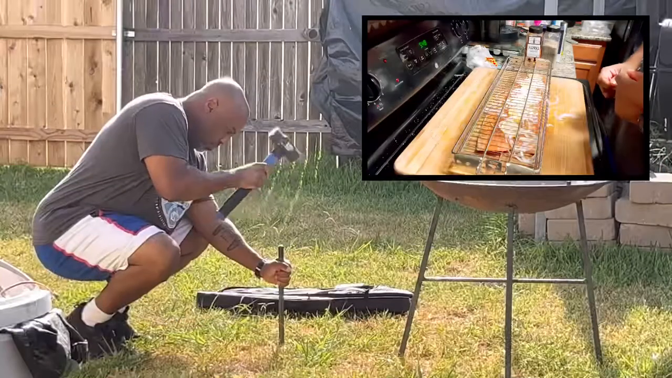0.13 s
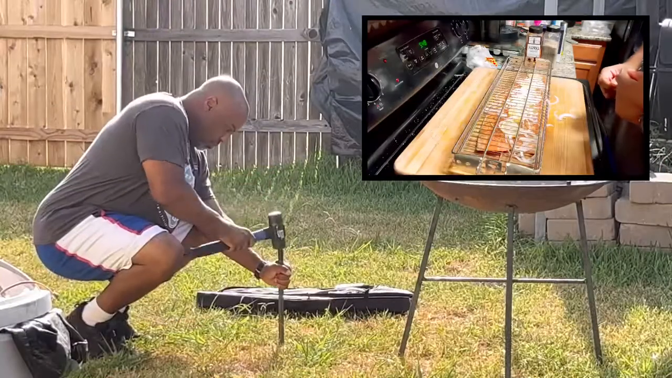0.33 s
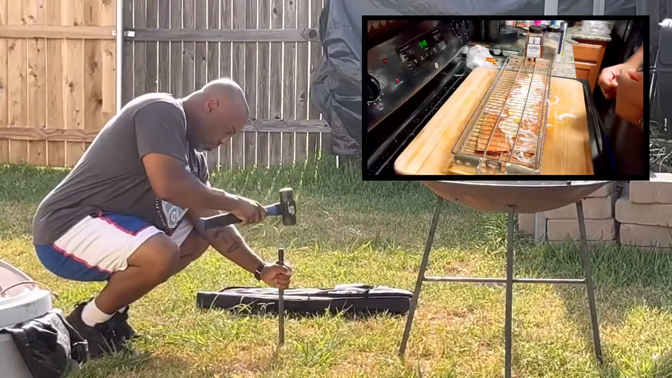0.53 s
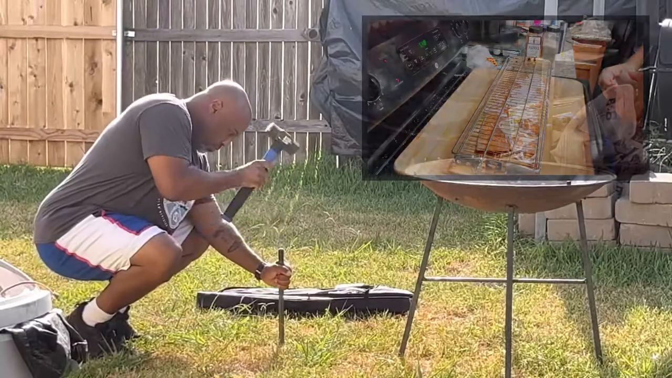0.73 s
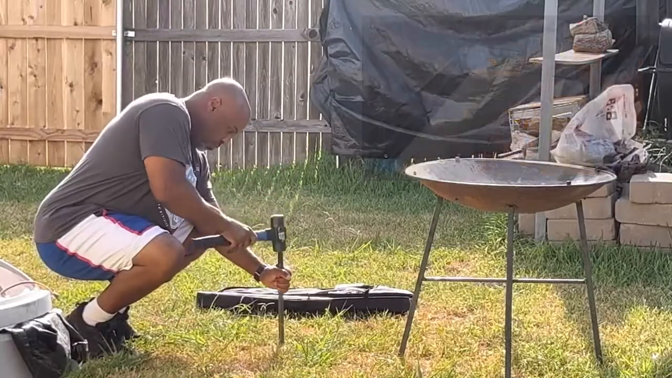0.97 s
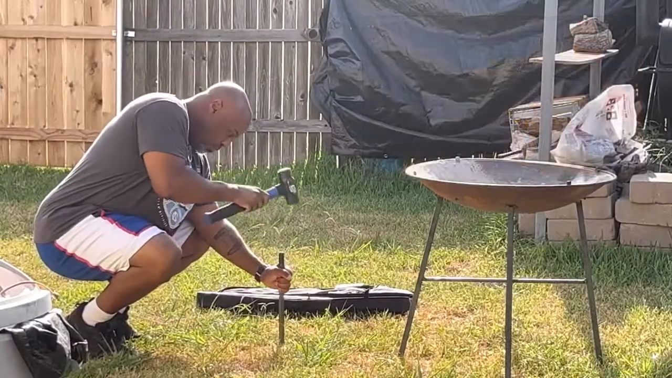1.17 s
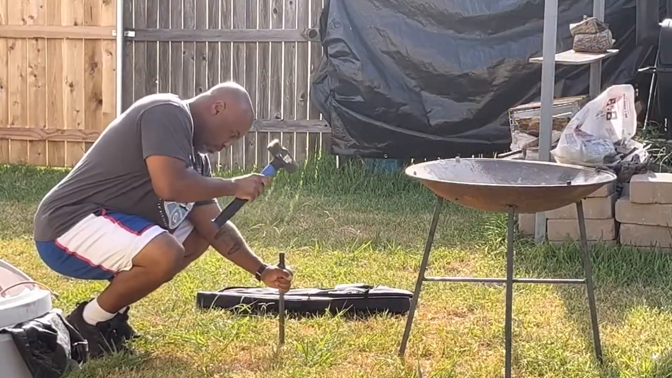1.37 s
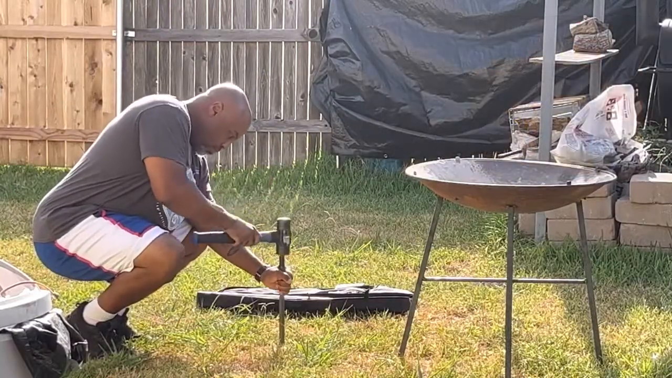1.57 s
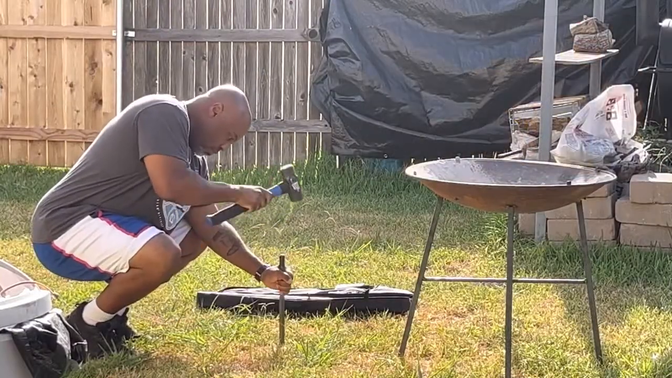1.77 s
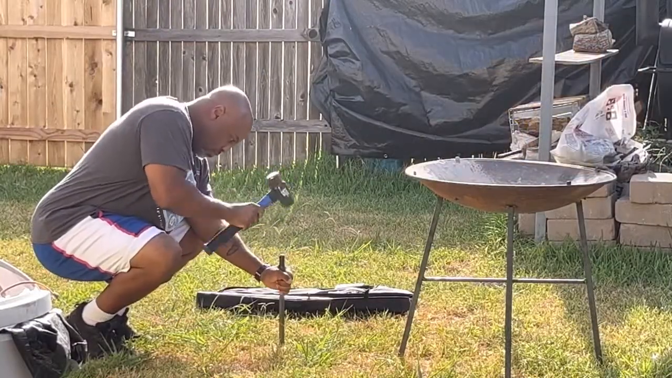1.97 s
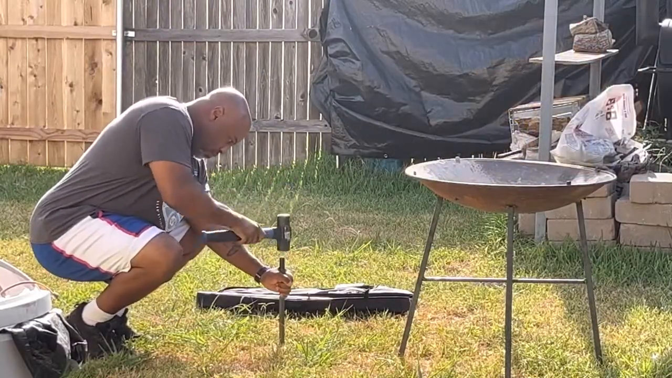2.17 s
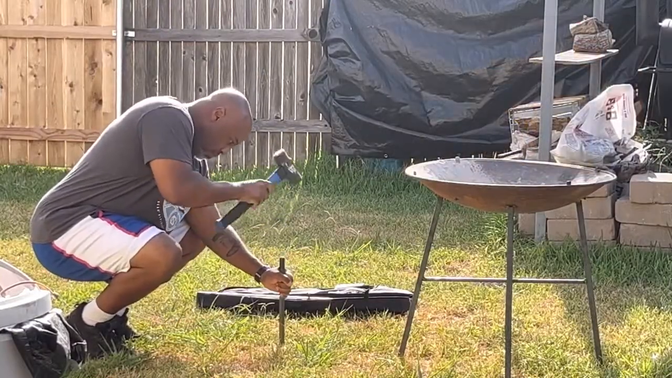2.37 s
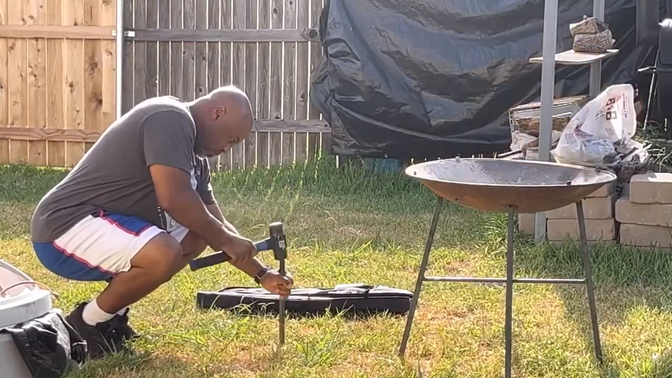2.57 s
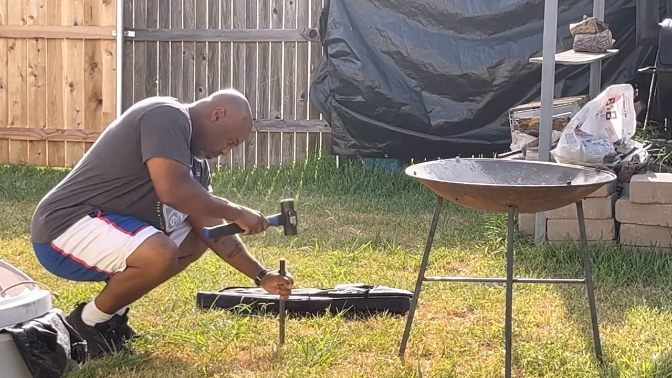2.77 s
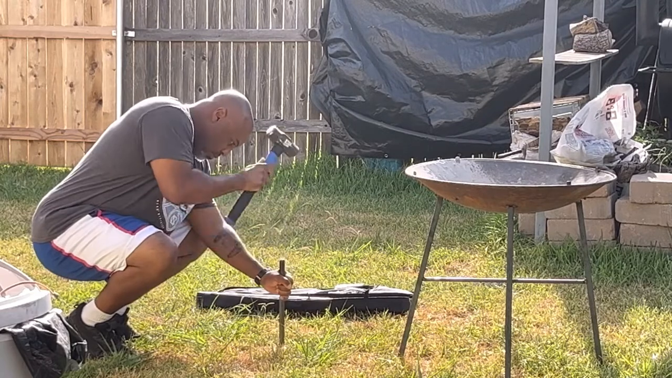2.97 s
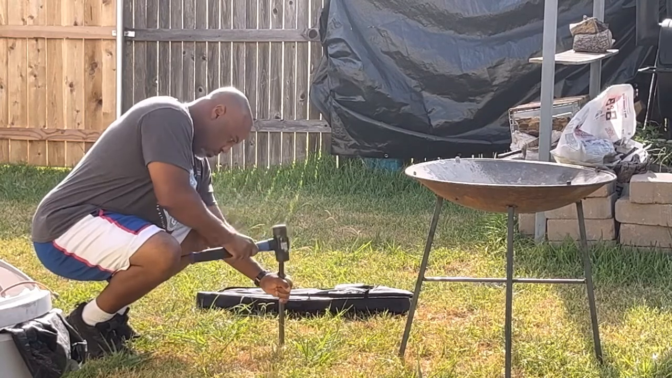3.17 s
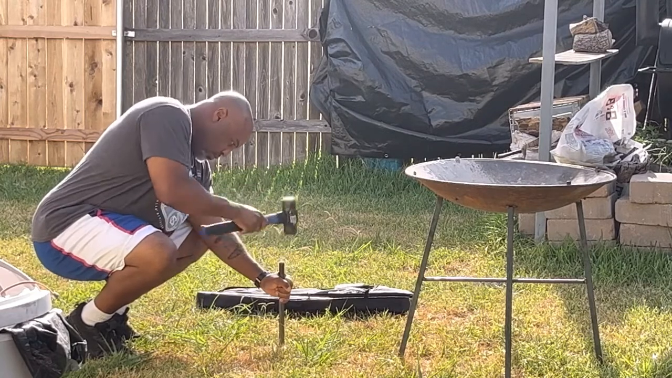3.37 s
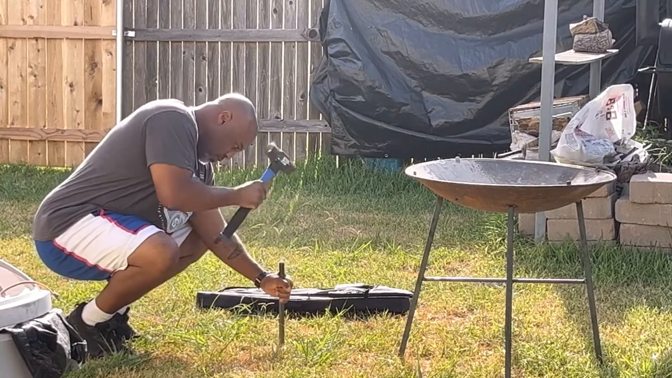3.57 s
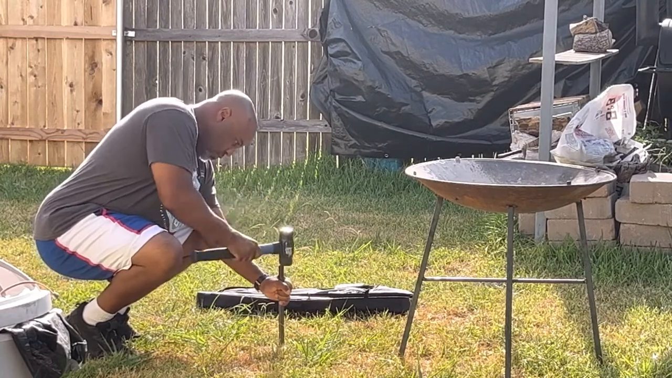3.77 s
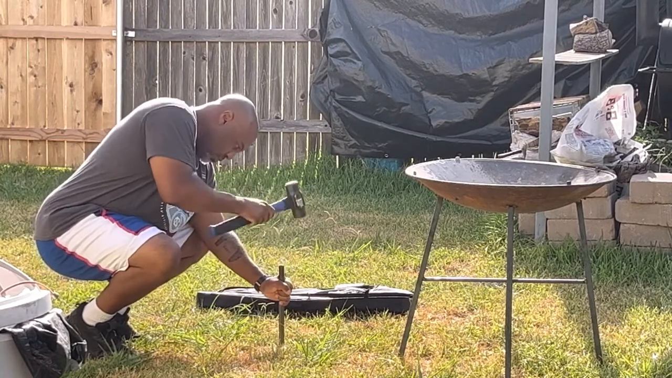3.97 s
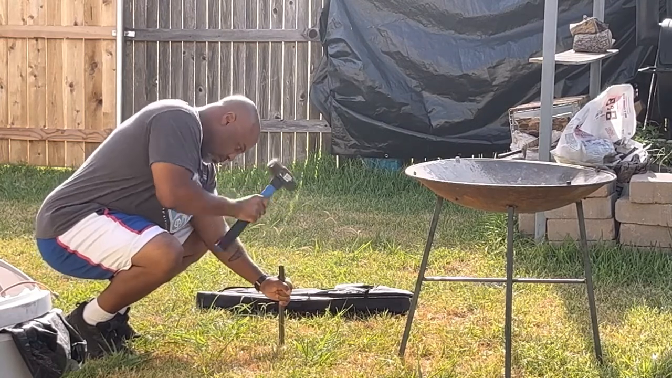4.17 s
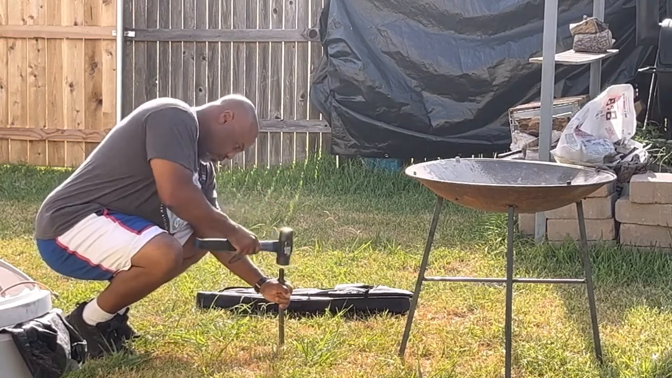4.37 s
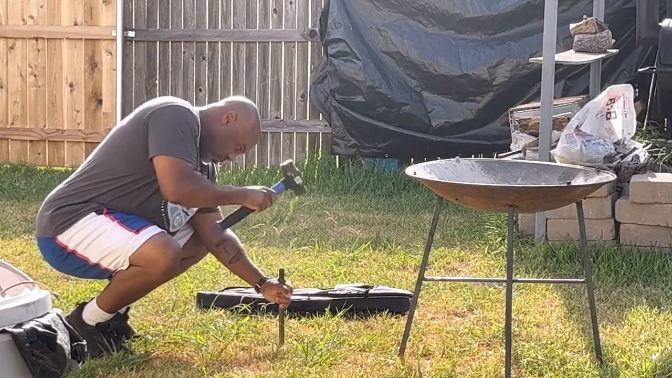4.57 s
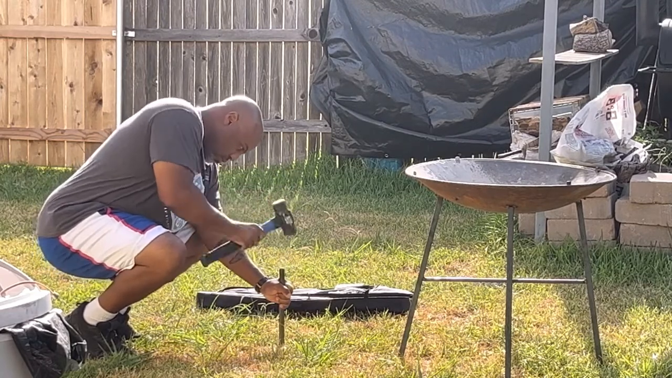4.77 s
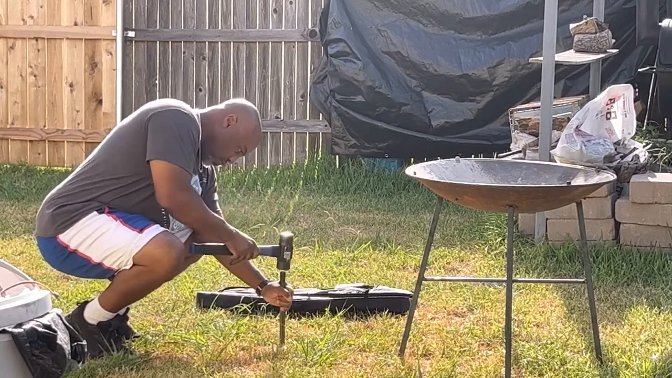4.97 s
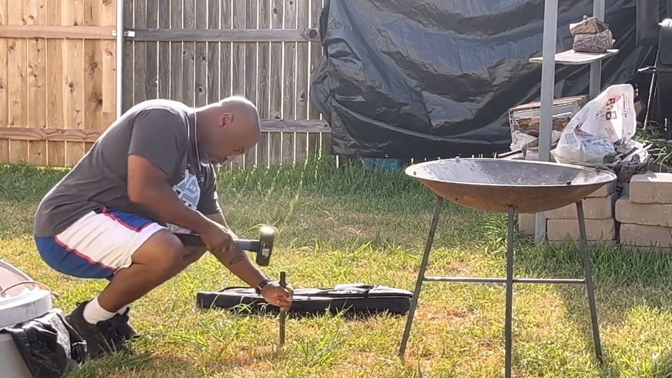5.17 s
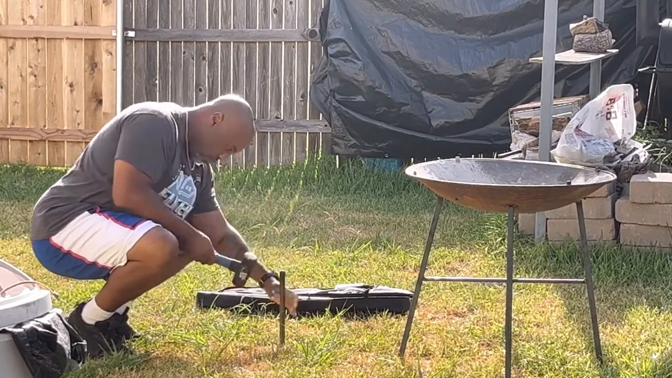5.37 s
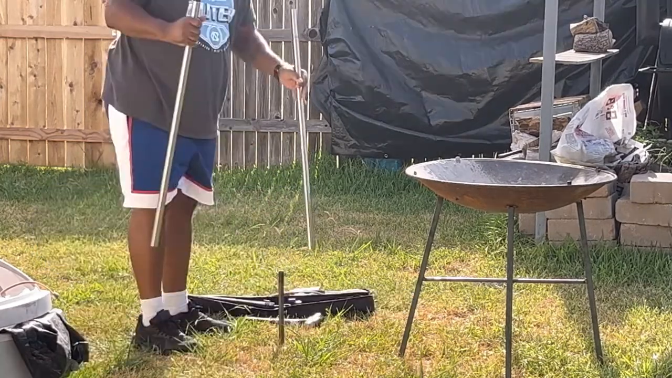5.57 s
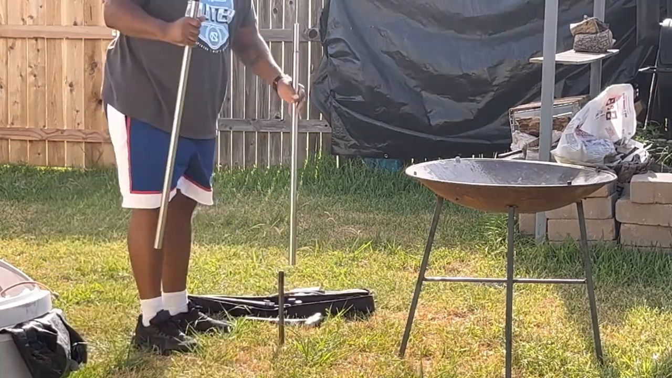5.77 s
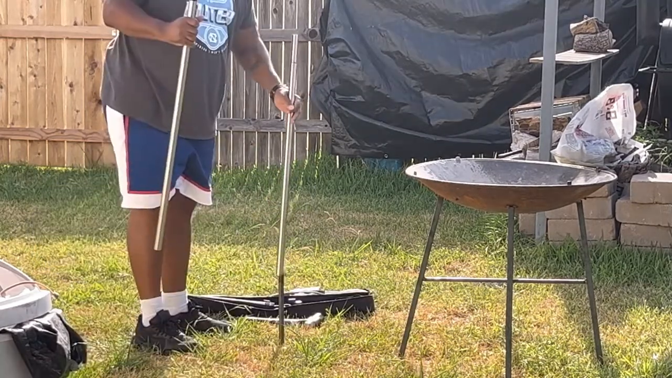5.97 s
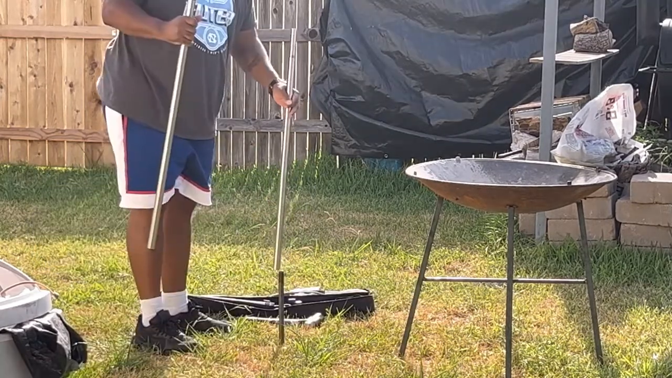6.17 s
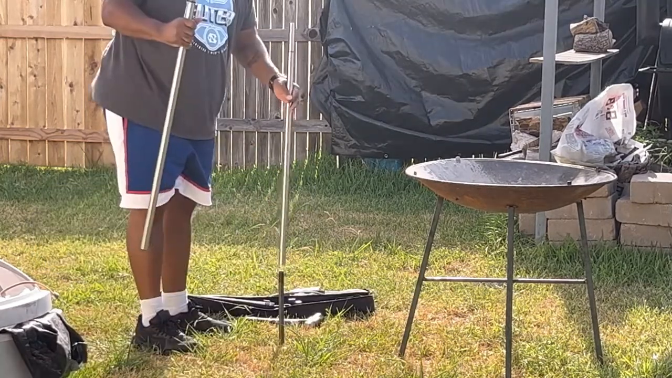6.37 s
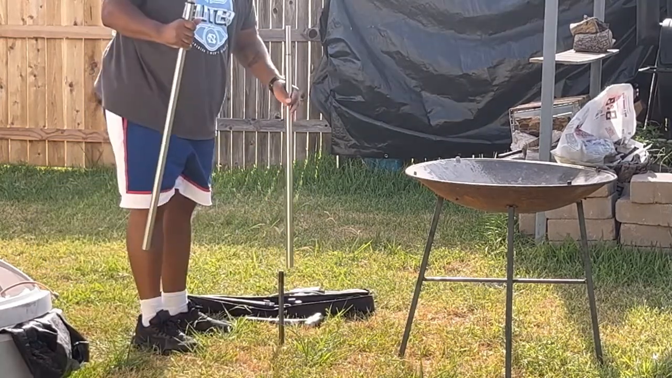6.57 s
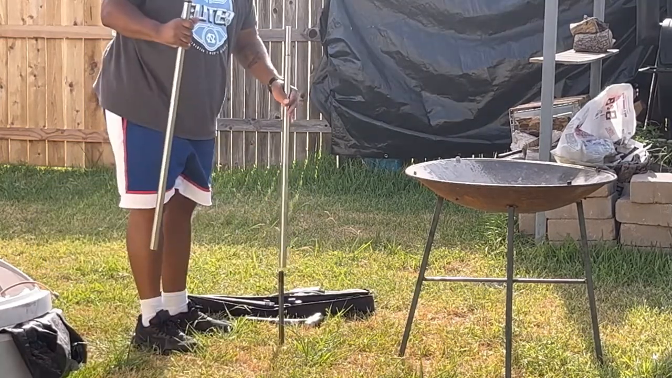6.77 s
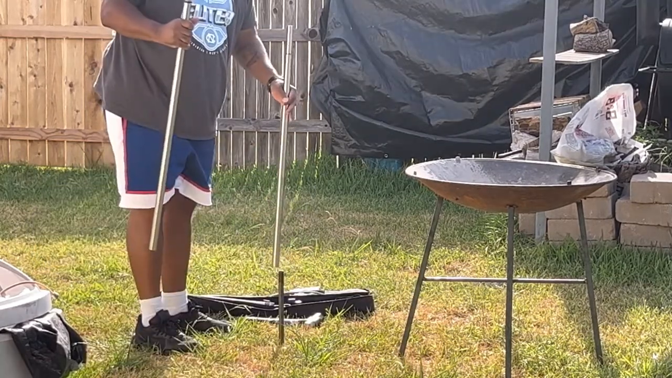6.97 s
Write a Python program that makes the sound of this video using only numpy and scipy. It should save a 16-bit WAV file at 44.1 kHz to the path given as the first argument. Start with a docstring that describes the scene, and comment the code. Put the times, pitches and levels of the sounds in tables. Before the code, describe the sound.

Nine sharp, evenly spaced hammer blows ring on a steel stake in an open yard, then a brief dip and two faint tube clinks.

```python
"""A muffled drone dies away as a fenced yard fades in: a club hammer drives a steel stake into the lawn.
A few metres off, each blow is heard in stereo: it cracks, rings stake and head and thumps through the soil.
Strikes are spiky noise and decaying sines; shaped noise makes the returns from fences and far houses.
After a short fade through near silence two thin tubes clink. A far motor, made of wavering sines, hums;
bands of noise make traffic rumble and hiss, and short swells of narrow noise make faint rustles."""
import sys
import numpy as np
from scipy import signal
from scipy.fft import rfft, irfft, next_fast_len
from scipy.io import wavfile
from scipy.ndimage import uniform_filter1d

SR = 44100
rng = np.random.default_rng(int(sys.argv[2]) if len(sys.argv) > 2 else 0)


def to_wav(s):
    """Save 16-bit WAV."""
    ch = np.atleast_2d(s).T  # columns
    pcm = np.round(np.clip(ch, -1, 1) * 32767)  # PCM
    wavfile.write(sys.argv[1], SR, pcm.astype(np.int16))


N = 309141  # length in samples

# All dB in the tables are relative: strength, tilt, echo or fades act on top of them.
# Hammer blows on the stake. Each row: start in seconds, strength in dB, treble in dB, soil thump in dB.
HAMMER_BLOWS = [(0.3495, -14, -8, -32), (0.9232, -11.5, -5.5, -28), (1.5016, -14.5, -1.5, -21),
                (2.049, -12, -2, -24.5), (2.5844, -13.5, -1.5, -25), (3.1729, -13.5, -1, -22),
                (3.716, -13, 1.5, -22), (4.275, -14, 0, -28), (4.8273, -14, -1.5, -26.5)]
# Rings of stake and hammer head, damped by hand and soil.
# Each row: frequency in Hz, level in dB, time to fall 60 dB in seconds.
STAKE_RINGS = [(864.2, -9.5, 0.099), (1108, -8.5, 0.081), (1167, -1.5, 0.13), (1531, -13.5, 0.22),
               (1734, -8.5, 0.064), (1993, -5, 0.14), (2081, -4, .1), (2406, -6.5, .1), (2545, -8, .12),
               (2705, -9.5, 0.077), (3114, -7.5, 0.081), (3290, -5.5, 0.14), (3314, -8, 0.19),
               (3420, -8, 0.15), (4260, -15, 0.058), (4713, -8, 0.14), (4890, -10, 0.15), (5300, -1, 0.05),
               (5460, -4.5, 0.22), (6476, -7.5, 0.12), (7690, -16, .07), (8420, -3, 0.088),
               (9580, -12.5, 0.09), (10800, -3, 0.083), (11400, -12.5, 0.07), (12990, -7, .06),
               (15400, -10.5, .055)]
# Spectrum of the crack of steel on steel. Each row: frequency in Hz, density in dB per Hz.
CRACK_SPECTRUM = [(100, -30.5), (300, -1.5), (600, -12), (1200, -3.5), (2200, 0.5), (3400, -2),
                  (4300, -4.5), (5400, -1.5), (7500, -14), (10700, -3.5), (12000, -21), (14200, -29),
                  (15400, -16.5), (16800, -43.5)]
# Dull knock of handle and turf. Each row: frequency in Hz, level in dB, time to fall 60 dB in seconds.
KNOCK_RINGS = [(138, -5, 0.18), (192.7, -0.5, 0.13), (265.4, -2, 0.092), (390, -4.5, 0.048), (577, -7, 0.1)]
# Clinks of the tubes. Each row: start in seconds, strength in dB, treble in dB.
TUBE_CLINKS = [(5.8913, -32, -11), (6.1383, -27.5, -4.5)]
# Rings of the thin tubes. Each row: frequency in Hz, level in dB, time to fall 60 dB in seconds.
TUBE_RINGS = [(1296, -10, 0.13), (2030, -4, 0.18), (2460, -4.5, 0.075), (2660, -3, 0.194), (3280, -1, 0.12),
              (4250, -1, 0.096), (6660, -19, 0.095), (6780, -10.5, 0.34), (7600, -5, 0.15),
              (7970, -10, 0.17), (8430, -14, .07), (8820, -8.5, 0.18), (9400, -12, 0.18),
              (10670, -17, 0.08), (11800, -14, 0.12)]
# Echo of the yard. Each row: frequency in Hz, near fences in dB, their 60 dB decay in seconds,
# far houses in dB, their 60 dB decay in seconds.
YARD_ECHO = [(150, -1.5, 0.25, -25.5, 0.7), (600, 2, .22, -21, 0.96), (1820, -3, 0.25, -25, 0.81),
             (4500, -6.5, 0.25, -24, 0.73), (8850, -4, 0.22, -24, 0.5), (15000, -1.5, .14, -28, 0.32)]
# Faint rustles of cloth or grass. Each row: centre in seconds, length in seconds, frequency in Hz,
# reach to either side in octaves, level in dB.
FAINT_RUSTLES = [(0.202, 0.027, 2700, .8, -67.5), (5.703, 0.075, 4700, 0.24, -87),
                 (5.8, 0.052, 3800, .27, -83.5), (6.871, 0.083, 3770, 0.245, -83.5)]
# The far motor. Each row: frequency in Hz, level in dB.
MOTOR_HUM = [(37.5, -2.5), (75, 3.5), (112, -6.5), (150, -15.5)]
# Spectrum of traffic rumble and hiss. Each row: frequency in Hz, density in dB per Hz.
TOWN_SPECTRUM = [(12, -32.5), (20, -9.5), (81, -4.5), (146, -16), (222, -16.5), (377, -22), (410, -15.5),
                 (446, -24.5), (485, -16.5), (558, -20.5), (1260, -26), (1960, -37), (3840, -49),
                 (5530, -53.5), (16000, -69.5)]
# Likeness of left and right noise. Each row: frequency in Hz, correlation from 0 to 1.
CHANNEL_LIKENESS = [(60, 0.95), (150, 0.7), (300, 0.9), (650, 0.3), (1400, .05), (2300, 1), (3200, 0.99),
                    (16000, 1)]
# Phase between left and right channels. Each row: frequency in Hz, lead of the left in radians.
CHANNEL_LEAD = [(2200, 0.5), (2900, 0.53), (5050, 0), (5250, 2), (6500, 4), (7000, 3.5), (7450, 5),
                (7750, 4.5), (9400, 7), (11200, 7.5), (11700, 9.5), (14000, 9.5), (14600, 12),
                (22050, 12.5)]

CRACK_DB, CRACK_T60_S, RING_DB, KNOCK_DB = 3.5, 0.055, -12, -26
# the lowest rings, and those around 2.6 kHz, grow as the stake sinks
LOW_RING_DB, LOW_RING_DB_PER_S = -6, 1.21
MIDDLE_RING_DB, MIDDLE_RING_DB_PER_S = -5, 1.54
THUMP_HZ, THUMP_LAG_S, THUMP_T60_S = 59.4, .018, 0.41
# one far wall answers faintly, best in the middle range
SLAP_S, SLAP_LENGTH_S, SLAP_DB, SLAP_HZ, SLAP_DB_PER_OCTAVE = 0.1337, 0.0046, -24.5, 3020, -6.5
ECHO_DB = -27.0
# the hum throbs: mean level, swing either way, period, a moment of full strength
HUM_DB, THROB_DB, THROB_S, THROB_TOP_S = -61, 3.5, 1.29, 3.15
RUMBLE_DB, HISS_DB = -64, -65.5
LATER_RUMBLE_DB, LATER_HISS_DB = -64.5, -66  # after the fade through near silence
DRONE_HZ, DRONE_OCTAVES, DRONE_DB, DRONE_S = 382, .18, -70.5, 0.71
# the yard fades in from a low level; the hiss starts lower still
OPEN_DB, OPEN_HISS_DB, OPEN_S = -9, -3, 1.125
# the sound fades through near silence between hammer and tubes
OUT_S, SILENT_S, IN_S, BACK_S, SILENCE_DB = 5.37, 5.44, 5.475, 5.645, -44
CEILING = 0.57  # the input stage rounds peaks towards this size
TOP_HZ = 16700


def hammer():
    """Blows through the air, and the thump that rolls through the soil a little later."""
    air, soil = np.zeros(N), np.zeros(N)
    t = np.arange(SR // 2) / SR
    thump = (1 - np.exp(-t / 0.013)) * fade(t, THUMP_T60_S) * np.sin(2 * np.pi * THUMP_HZ * t)
    for s, db, treble_db, thump_db in HAMMER_BLOWS:
        low_db = LOW_RING_DB + LOW_RING_DB_PER_S * s
        middle_db = MIDDLE_RING_DB + MIDDLE_RING_DB_PER_S * s
        # tilt: Hz, dB
        tilt = [(1250, low_db), (1700, 0), (2150, 0), (2600, middle_db),
                (3150, 0.0022), (5000, 0.0017), (8000, treble_db)]
        blow = strike(STAKE_RINGS, tilt, rough=1.12, crack_db=CRACK_DB, ring_db=RING_DB)
        add(air, s, undb(db) * blow)
        knock = ring(KNOCK_RINGS, [(1000, 0)], scatter_db=2.0, rough=.3)  # no tilt
        knock = knock * np.minimum(t / 0.0036, 1)
        add(air, s, undb(db + KNOCK_DB) * knock)
        add(soil, s + THUMP_LAG_S, undb(db + thump_db) * thump)
    return air, soil


def strike(modes, tilt, rough, crack_db, ring_db):
    """Metal meets metal: a short crack of spiky chatter, and the rings it sets off."""
    t = np.arange(SR // 2) / SR
    hz = np.arange(len(t) // 2 + 1) * SR / len(t)
    chatter = unit(rng.standard_normal(len(t)) ** 3)  # cubing makes it spiky
    colour = undb(along(CRACK_SPECTRUM, hz) + along(tilt, hz))
    crack = irfft(rfft(chatter) * colour) * fade(t, CRACK_T60_S)
    rings = ring(modes, tilt, scatter_db=2.0, rough=rough)
    onset = np.minimum(t / 0.0019, 1)
    return (undb(crack_db) * crack + undb(ring_db) * rings) * onset


def ring(modes, tilt, scatter_db, rough):
    """Decaying modes; each contact weights and detunes them, and a loose grip makes them flutter."""
    t = np.arange(SR // 2) / SR
    hz, db, t60 = np.transpose(modes)[:, :, None]
    level_chance, tuning_chance, phase_chance = rng.standard_normal((3, len(modes), 1))
    step = int(.003 * SR)  # each random value is held 3 ms, then slewed
    wobble = rng.standard_normal((2, len(modes), len(t) // step + 1)).repeat(step, axis=2)
    phase_wobble, size_wobble = rough * uniform_filter1d(wobble, step)[:, :, :len(t)]
    phase = 2 * np.pi * (hz * (1 + .004 * tuning_chance) * t + phase_chance) + phase_wobble
    level = undb(db + along(tilt, hz) + scatter_db * level_chance)
    return (level * fade(t, t60) * (1 + 0.69 * size_wobble) * np.sin(phase)).sum(axis=0)


def tubes():
    """Light taps of thin tubes: little bass, short rings."""
    air = np.zeros(N)
    for s, db, treble_db in TUBE_CLINKS:
        tilt = [(500, -3.5), (1500, -3.5), (5000, -3), (8000, treble_db)]  # Hz, dB
        clink = strike(TUBE_RINGS, tilt, rough=0.48, crack_db=-0.5, ring_db=-9.5)
        add(air, s, undb(db) * clink)
    return air


def yard(air):
    """Direct sound, then dense returns from near fences and a longer wash from far houses."""
    pair, hz = noise_pair(SR)
    t = np.arange(SR) / SR
    echo = 0
    for k, (centre, near_db, near_s, far_db, far_s) in enumerate(YARD_ECHO):
        share = along([(row[0], k == j) for j, row in enumerate(YARD_ECHO)], hz)
        near = undb(near_db) * fade(t, near_s)
        far = undb(far_db) * fade(t, far_s) * np.minimum(t / 0.012, 1)  # builds up slowly
        slap_db = SLAP_DB + SLAP_DB_PER_OCTAVE * abs(np.log2(centre / SLAP_HZ))
        slap = undb(slap_db) * np.exp(-((t - SLAP_S) / SLAP_LENGTH_S) ** 2)
        echo = echo + irfft(pair * share) * (near + far + slap)
    # the first returns need 2 ms to arrive
    echo = undb(ECHO_DB) * echo * np.clip((t - .002) / 0.0073, 0, 1)
    return air + signal.fftconvolve(echo, air[None])[:, :N]


def rustles():
    """Cloth or grass rubs: short swells of narrow hiss."""
    air = np.zeros(N)
    t = np.arange(SR) / SR - .5
    hz = np.arange(SR // 2 + 1)
    for s, length, centre, octaves, db in FAINT_RUSTLES:
        hiss = unit(irfft(rfft(rng.standard_normal(SR)) * band(hz, centre, octaves)))
        swell = undb(db) * hiss * np.exp(-(2 * t / length) ** 2)
        # the swell peaks at s; what would precede the start is left off
        add(air, max(s - .5, 0), swell[int(max(.5 - s, 0) * SR):])
    return air


def hum():
    """A far motor: a few multiples of its turning rate, wavering in pitch and size."""
    turn = np.cumsum(1 + 0.018 * walk(3.9)) / SR
    return sum(undb(db + 2.3 * walk(9)) * np.sin(2 * np.pi * hz * turn) for hz, db in MOTOR_HUM)


def town(rumble_db, hiss_db):
    """Traffic rumble and hiss in half-octave bands that swell together and flicker alone."""
    size = next_fast_len(N)
    pair, hz = noise_pair(size)
    pair = pair * undb(along(TOWN_SPECTRUM, hz))
    swell = walk(0.99)
    # each level is set within a reference band
    rumble = undb(rumble_db) / np.std(irfft(pair * (hz > 150) * (hz < 550), size))
    hiss = undb(hiss_db) / np.std(irfft(pair * (hz > 650) * (hz < 2500), size))
    out = 0
    for centre in 20 * 2 ** np.arange(0, 10, .5):
        gain = rumble if centre < 600 else hiss
        noise = irfft(pair * band(hz, centre, 0.49), size)[:, :N]
        out = out + noise * gain * undb(0.78 * swell + 1.4 * walk(6.1))
    return out


def drone(t):
    """A narrow band of low noise that fades out."""
    size = next_fast_len(N)
    pair, hz = noise_pair(size)
    noise = unit(irfft(pair * band(hz, DRONE_HZ, DRONE_OCTAVES), size)[:, :N])
    return undb(DRONE_DB) * noise * np.clip(1 - t / DRONE_S, 0, 1)


def noise_pair(size):
    """Spectra of left and right noise, alike by the likeness of the channels, and their frequencies."""
    hz = np.arange(size // 2 + 1) * SR / size
    alike = np.clip(along(CHANNEL_LIKENESS, hz), 0, 1)
    mid, side = rfft(rng.standard_normal((2, size))) * np.sqrt([1 + alike, 1 - alike])
    return np.array([mid + side, mid - side]) / 2, hz


def band(hz, centre_hz, octaves):
    """Triangle on a log-frequency axis, reaching the given octaves to either side."""
    return np.clip(1 - abs(np.log2((hz + 1) / centre_hz)) / octaves, 0, 1)


def walk(rate):
    """Random levels held 1 / rate s and slewed twice; spread near 1."""
    k = int(SR / rate)
    held = np.repeat(rng.standard_normal(size=200), k)[:N]
    return 1.2 * uniform_filter1d(uniform_filter1d(held, k), k)


def add(track, s, sound):
    """Mixes a sound in at s seconds."""
    i = int(s * SR)
    track[i:i + len(sound)] += sound[:len(track) - i]


def along(table, hz):
    """Second column of a table read on a log-frequency axis."""
    table = np.array(table, float)
    return np.interp(np.log(hz + 1), np.log(table[:, 0] + 1), table[:, 1])


def fade(t, t60):
    """Exponential decay that falls 60 dB in t60 seconds."""
    return np.exp(-np.log(1000) * t / t60)


def unit(x):
    """Scales a sound to an RMS of one."""
    return x / np.sqrt(np.mean(x ** 2))


def undb(db):
    """Amplitude factor of a level in dB."""
    return 10 ** (np.asarray(db) / 20)


def scene():
    """Blows and clinks in the yard over rustles, town and hum, faded in, down and back up, plus the drone."""
    t = np.arange(N) / SR
    closed = np.clip(1 - t / OPEN_S, 0, 1)  # 1 at the start, 0 once faded in
    later = t > SILENT_S
    rumble_db = np.where(later, LATER_RUMBLE_DB, RUMBLE_DB)
    hiss_db = np.where(later, LATER_HISS_DB, HISS_DB) + OPEN_HISS_DB * closed
    hum_db = HUM_DB + THROB_DB * np.cos(2 * np.pi * (t - THROB_TOP_S) / THROB_S)
    air, soil = hammer()
    mix = yard(air + tubes()) + soil + rustles()
    mix = mix + town(rumble_db, hiss_db) + undb(hum_db) * hum()
    fade_out = (SILENT_S - t) / (SILENT_S - OUT_S)
    fade_in = (t - IN_S) / (BACK_S - IN_S)
    ramp = np.clip(np.maximum(fade_out, fade_in), 0, 1)
    return mix * undb(OPEN_DB * closed) * np.maximum(ramp, undb(SILENCE_DB)) + drone(t)


def record(dry):
    """Treble phase differs between left and right; peaks are rounded, the top is cut."""
    size = next_fast_len(N + SR // 10)
    hz, lead = np.transpose(CHANNEL_LEAD)
    lead = np.interp(np.arange(size // 2 + 1) * SR / size, hz, lead, left=0)
    lead = uniform_filter1d(lead, size=150 * size // SR)  # smoothed over 150 Hz
    turns = np.exp(.5j * np.array([lead, -lead]))  # half the lead to each channel
    channels = irfft(rfft(dry, size) * turns, size)[:, :N]
    rounded = CEILING * np.tanh(channels / CEILING)
    low_pass = signal.ellip(8, .2, 80, TOP_HZ, fs=SR, output="sos")
    return signal.sosfilt(low_pass, rounded)


dry = scene()
out = record(dry)
to_wav(out)
```